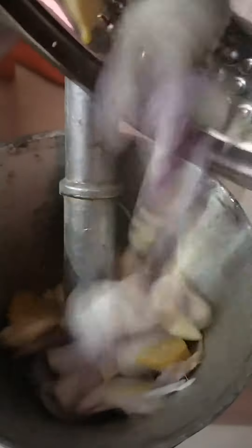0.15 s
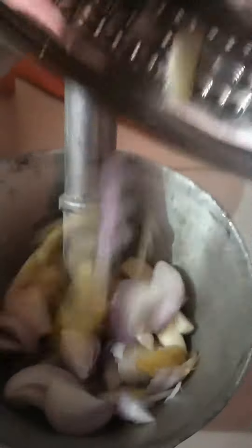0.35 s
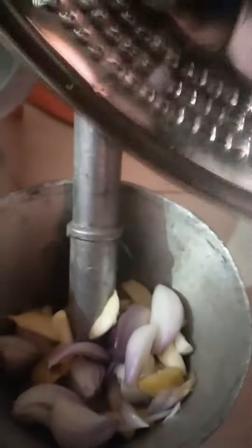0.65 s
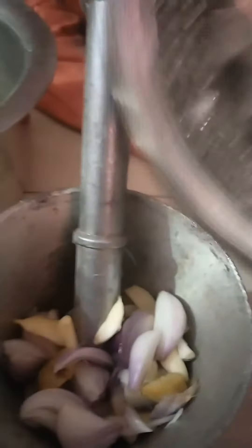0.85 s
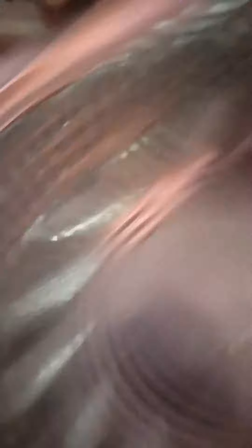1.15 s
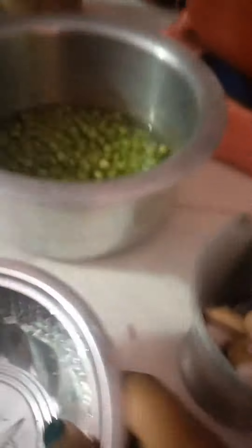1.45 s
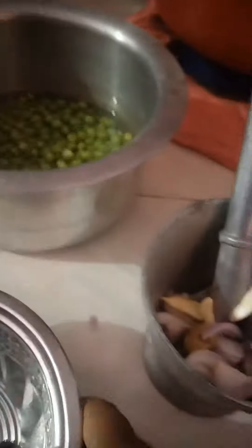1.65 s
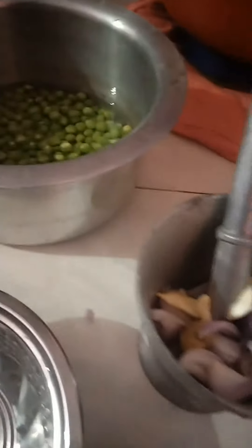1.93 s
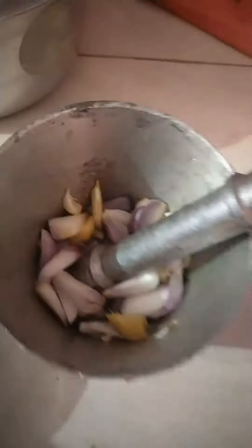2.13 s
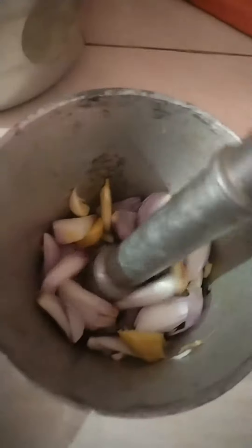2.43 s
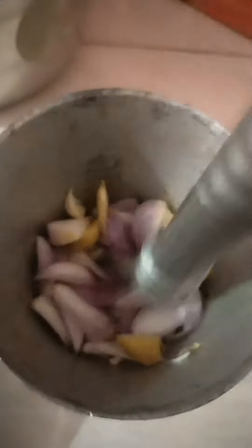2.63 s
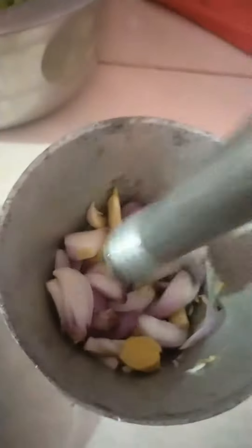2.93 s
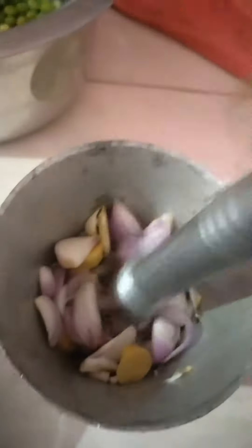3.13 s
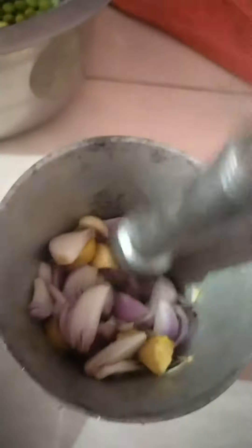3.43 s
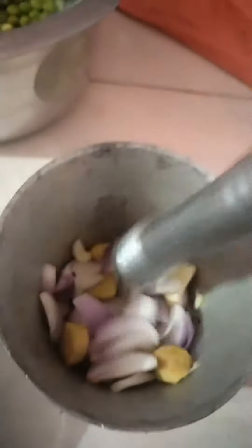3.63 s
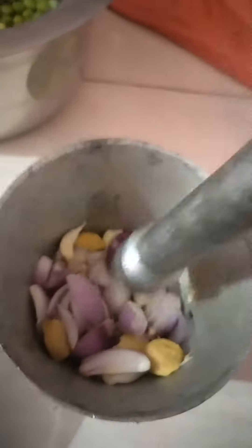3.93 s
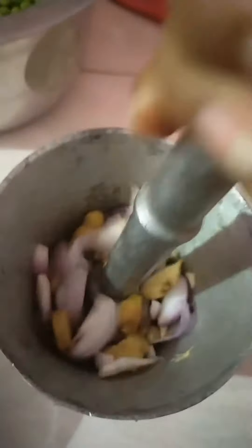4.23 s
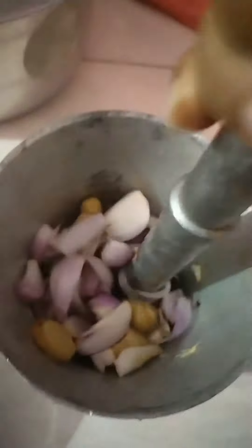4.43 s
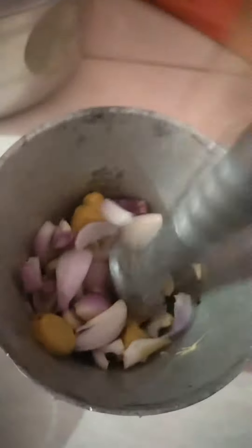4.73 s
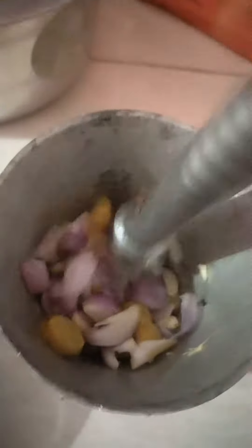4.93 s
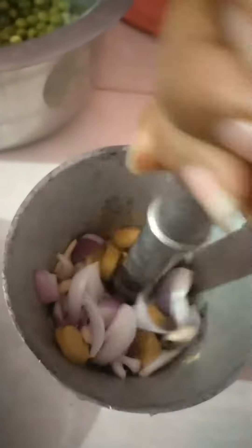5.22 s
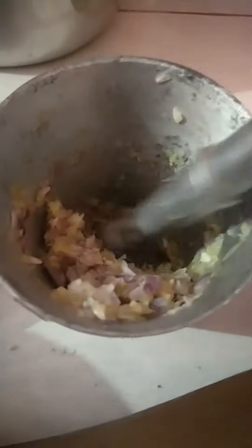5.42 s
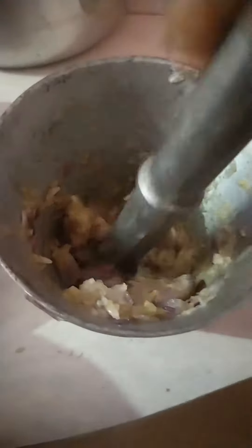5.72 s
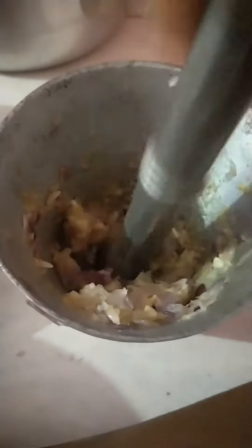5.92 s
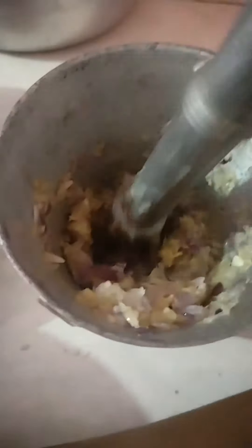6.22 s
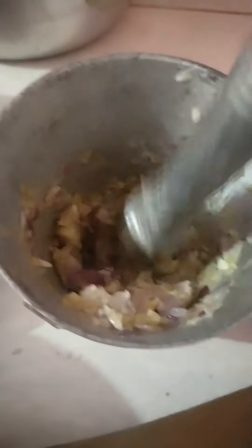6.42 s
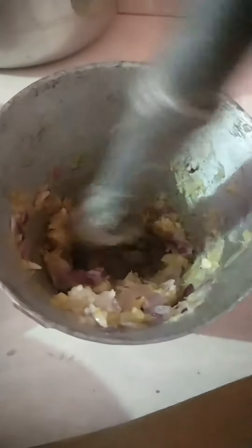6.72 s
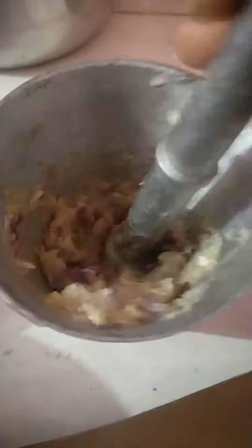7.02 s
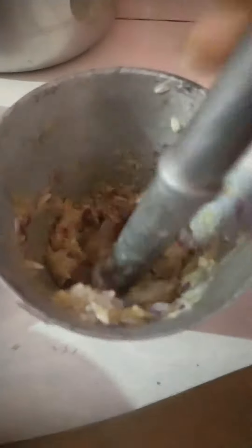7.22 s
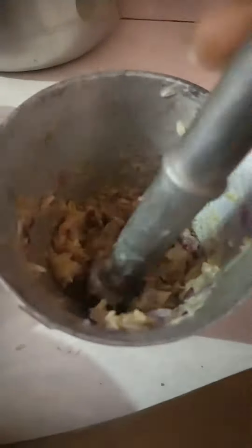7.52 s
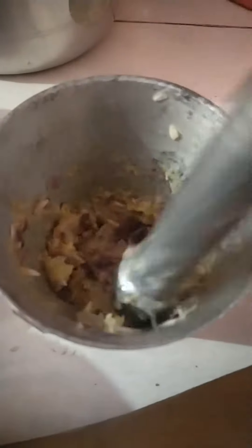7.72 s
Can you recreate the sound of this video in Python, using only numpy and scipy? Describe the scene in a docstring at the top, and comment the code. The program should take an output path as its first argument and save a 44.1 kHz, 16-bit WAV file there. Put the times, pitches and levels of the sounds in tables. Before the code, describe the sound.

Over low room rumble and faint hiss, chopped vegetables spill into a metal bowl with a crackly rustle and small taps. Soft rubbing leads to a bright, buzzing clatter of thin steel. Regular crisp crunches follow as a pestle crushes the pieces. The sound cuts out momentarily, then louder, irregular metal knocks ring through wet mash. The microphone is close, with slight hard-surfaced reverberation.

```python
"""Firm pieces of onion, garlic and ginger rustle and tap into a metal mortar over a low kitchen rumble.
A steel colander clatters on the counter: each bounce is a contact that excites the metal's modes.
A metal pestle then crunches the raw pieces, heard as dense streams of tiny cracks coloured by the bowl.
After a short break the mash is thin and the pestle knocks through to the ringing metal. All is heard
close up, the foreground sounds with a little dense reverberation."""
import sys
import numpy as np
from scipy import signal
from scipy.fft import rfft, irfft, next_fast_len
from scipy.io import wavfile
from scipy.ndimage import uniform_filter1d

SR = 44100
rng = np.random.default_rng(int(sys.argv[2]) if len(sys.argv) > 2 else 0)


def materialize(psi):
    """Save the field psi as 16-bit PCM at rate SR to the path in sys.argv[1].

    A 1-D psi becomes a single channel; in a 2-D psi each row is a channel.
    """
    bounded = np.clip(np.atleast_2d(psi).T, -1, 1)
    quanta = np.round(bounded * 32767).astype(np.int16)
    wavfile.write(sys.argv[1], SR, quanta)


N = 346626
SIZE = 16384  # samples in one short event
TIME, AGE, BINS = np.arange(N) / SR, np.arange(SIZE) / SR, np.fft.rfftfreq(SIZE, 1 / SR)

# Ringing modes of pestle and mortar. Each row: frequency in Hz, relative level in dB, t60 in seconds.
MORTAR_MODES = [(1222, -10, .13), (1335, -3, .22), (1410, -3, .11), (2223, -12, .15), (2885, -8, .18),
                (2988, -1, .23), (3042, -6, .2), (3262, -11, .12), (4247, -15, .18), (5259, -6, .16),
                (5300, -8, .13), (7267, -16, .11), (8160, -12, .11), (9367, -24, .13)]
# Spectrum of a knock on the mortar. Each row: frequency in Hz, relative level in dB per Hz.
KNOCK_SPECTRUM = [(100, -33.5), (250, -6), (420, -3.5), (620, -13), (1000, 0), (1750, -1.5), (2600, 0),
                  (3700, -4), (5500, -12), (8300, -3.5), (10300, -26.5), (12500, -21), (14500, -18),
                  (16000, -43.5)]
# Spectrum of crushed or rubbed food. Each row: frequency in Hz, relative level in dB per Hz.
CRUNCH_SPECTRUM = [(150, -24.5), (450, -7), (620, -11.5), (800, -2.5), (1100, 2), (1700, -2), (2500, -2),
                   (4500, -5.5), (7000, -5), (9500, -11.5), (14000, -13.5), (15500, -2.5)]
# Full blows: the pestle glances off the wall, then seats on the bottom a moment later.
# Each row: start in seconds, glance level in dB, lag of the seating in seconds, seating level in dB,
# brightness in dB, ring in dB, favoured frequency in Hz, its lift in dB (levels before the mix trims).
FULL_BLOWS = [(5.9441, -20.5, .005, -13.5, -3.5, -26, 2750, 5),
              (6.3462, -16, .0026, -22.5, -2.5, -33, 2400, 5),
              (6.711, -45, .008, -26.5, -14, -34, 2540, 14), (6.85, -32, .006, -36.5, 6.5, -34, 2300, -1),
              (6.972, -29.5, .018, -22, 4.5, -6.5, 2180, 14),
              (7.118, -19.5, .006, -18, -8, -25.5, 2426, 10),
              (7.2638, -16.5, .004, -33, 7.5, -5.5, 3080, 14), (7.526, -24.5, .017, -21, 3, -0.5, 3110, 10),
              (7.7705, -22.5, .0082, -19, -3, -2, 5450, 13), (7.8224, -24, .014, -36, 0.5, -0.5, 3070, 6.5)]


def amp(db):
    """Decibel law: 20 dB is a tenfold gain in amplitude."""
    return np.exp(np.asarray(db) * np.log(10) / 20)


def unit(x):
    """Normalisation of a signal to an rms of 1."""
    return x / np.sqrt(np.mean(x ** 2) + 1e-20)


def spectrum(points, hz):
    """Interpolation of a table along a logarithmic frequency axis."""
    table_hz, value = np.transpose(points)
    return np.interp(np.log(hz + 1), np.log(table_hz + 1), value)


def curve(points):
    """Linear interpolation of a table along time."""
    return np.interp(TIME, *np.transpose(points))


def add(mix, s, sound):
    """Superposition: a sound is summed into the mix from time s in seconds."""
    start = round(s * SR)
    sound = sound[:, max(-start, 0):]
    part = mix[:, max(start, 0):][:, :sound.shape[1]]
    part += sound[:, :part.shape[1]]


def pair(shape, same):
    """Partial coherence: two noises whose correlation is same."""
    a, b = rng.standard_normal((2, shape))
    same = np.clip(same, 0, 1)
    return np.array([a, same * a + np.sqrt(1 - same ** 2) * b])


def wander(step_s):
    """Random modulation: a new chance value every step_s seconds, joined by straight lines."""
    values = rng.standard_normal(SIZE)
    return np.interp(TIME / step_s, np.arange(SIZE), values)


def sized(x, db, length):
    """Energy scaling: x gets the energy of a sound of level db lasting length seconds."""
    rms = np.sqrt(np.sum(x ** 2) / 2 / (length * SR))
    return amp(db) * x / rms


def causal(db):
    """Minimum phase: the Hilbert transform of the log gain over BINS gives the phase."""
    mirrored_db = np.r_[db, db[-2:0:-1]]
    log_gain = np.log(amp(mirrored_db))
    return np.exp(np.conj(signal.hilbert(log_gain)))[:len(db)]


def colour(points, thud_db, bright_db, focus_hz=1000, lift_db=0):
    """Excitation spectrum: low and high shelves, and a band favoured by the spot that is hit."""
    shelves = [(1400, thud_db), (2100, 0), (4300, 0), (7000, bright_db)]  # Hz, dB
    octaves = np.log2((BINS + 1) / focus_hz)
    lift = lift_db * np.exp(-(octaves / .24) ** 2)
    return causal(spectrum(points, BINS) + spectrum(shelves, BINS) + lift)


def bowl(depth_db):
    """Cavity resonance: direct sound plus the bowl's air resonances, as each microphone hears them."""
    # Resonances of the air in the mortar.
    # Each row: frequency in Hz, width in Hz, left level in dB, right level in dB (before depth_db).
    air_modes = [(797, 120, 2, 2), (986.4, 84, 10, 16.5), (1046, 64, 3.5, 1.5), (1270, 74, 3, 9),
                 (1250, 110, 2.5, -3.5), (2116, 230, -11, -2), (2790, 190, -4, -1),
                 (4900, 600, -16.5, -0.5), (5896, 250, -14.5, 1.5), (7020, 500, -9.5, -0.5)]
    response = np.ones((2, len(BINS)), complex)
    for hz, width, left_db, right_db in air_modes:
        peak = 1j * BINS * width / (hz ** 2 - BINS ** 2 + 1j * BINS * width)
        response += amp(depth_db) * amp([[left_db], [right_db]]) * peak
    return response


def ports(x):
    """Inter-channel differences: the two microphones differ in phase and level with frequency."""
    # Phase of the left against the right. Each row: frequency in Hz, lead of the left in radians.
    phase_lead = [(0, 1), (500, 2), (700, -2), (1100, -2.5), (1550, -4), (2300, -4.5), (3000, -5),
                  (4300, -5.5), (5300, -8), (7500, -9), (15000, -15)]
    # Balance of the two microphones. Each row: frequency in Hz, left minus right in dB.
    balance = [(300, 4), (600, 1), (1100, 1.7), (2500, 0.7), (5000, -2.2), (8500, 2.5), (14000, -2.2)]
    size = next_fast_len(N + SIZE, real=True)
    hz = np.fft.rfftfreq(size, 1 / SR)
    side = amp(spectrum(balance, hz) / 2)
    left = side * np.exp(1j * spectrum(phase_lead, hz))
    right = 1 / side
    return irfft(rfft(x, size) * np.array([left, right]), size)[:, :N]


def wash(points, same):
    """Spectral shaping: steady noise of a given spectrum, scaled to rms 1."""
    size = next_fast_len(N, real=True)
    gain = amp(spectrum(points, np.fft.rfftfreq(size, 1 / SR)))
    return unit(irfft(rfft(pair(size, same)) * gain, size)[:, :N])


def background():
    """Stationary and modulated noise: low rumble, soft hiss and a few wavering tones."""
    # Rumble spectrum. Each row: frequency in Hz, relative level in dB per Hz.
    rumble_spectrum = [(12, -35), (20, -4.5), (59, 9), (147, -1), (243, -8), (287, -11), (512, -36),
                       (700, -48), (910, -67), (1540, -120)]
    # Hiss spectrum. Each row: frequency in Hz, relative level in dB per Hz.
    hiss_spectrum = [(300, 7), (600, 2.5), (1200, -4.5), (2200, -10), (3200, -8.5), (4500, -18),
                     (7000, -19.5), (10000, -23.5), (15500, -27.5)]
    # Rumble level before its random wander. Each row: time in seconds, dB under 110 Hz, dB above.
    rumble_levels = np.array([(0, -52, -46.5), (.6, -53, -53), (.9, -53, -47.5), (1.35, -46.5, -53.5),
                              (1.8, -56, -54.5), (2.25, -51.5, -56.5), (2.6, -55.5, -52.5), (3.3, -54, -53),
                              (4.4, -54, -54), (5.3, -54, -53.5), (5.43, -75, -64), (5.6, -46.5, -54),
                              (6.1, -51.5, -53.5), (6.45, -48.5, -46), (6.75, -53, -57), (7.0, -57.5, -54),
                              (7.4, -58, -56), (7.86, -54, -48)])
    # Hiss level. Each row: time in seconds, level in dB.
    hiss_levels = [(0, -63), (1, -70.5), (2.4, -68), (5.3, -67.5), (5.45, -57.5), (5.7, -71), (6.5, -63),
                   (7.86, -70)]
    # Faint tones that come and go.
    # Each row: start in seconds, end in seconds, frequency in Hz, width in Hz, level in dB.
    faint_tones = [(2.3, 5.3, 161, 8, -55), (2.85, 3.5, 162, 2, -48), (6.38, 6.57, 246, 4, -43),
                   (2.04, 2.14, 3779, 80, -77), (4.6, 5.4, 3460, 90, -82), (5.3, 5.85, 3068, 20, -70),
                   (5.3, 5.95, 3400, 70, -71), (5.54, 5.76, 3400, 50, -68), (5.55, 5.75, 4097, 30, -80),
                   (5.9, 6.6, 3410, 40, -75)]

    rumble = wash(rumble_spectrum, 0.97)
    lowpass = signal.butter(3, 110, fs=SR, output="sos")
    deep = signal.sosfiltfilt(lowpass, rumble)
    deep_level = amp(curve(rumble_levels[:, [0, 1]]))
    upper_level = amp(curve(rumble_levels[:, [0, 2]]))
    out = unit(deep) * deep_level + unit(rumble - deep) * upper_level
    out *= amp(1.77 * wander(.09))  # the rumble swells and sinks at random: dB, seconds
    out += wash(hiss_spectrum, 0.04) * amp(curve(hiss_levels))
    for start, end, hz, width, db in faint_tones:
        count = max(round((end - start) * SR), 2)
        # a phase that wanders at random widens the line
        steps = uniform_filter1d(rng.standard_normal(count), size=200)
        drift = np.cumsum(steps) * np.sqrt(2 * np.pi * abs(width) / SR)
        tone = np.sqrt(2) * np.sin(2 * np.pi * hz * TIME[:count] + drift)
        tone *= signal.windows.tukey(count, .3)
        add(out, start, amp(db) * np.array([tone, tone]))
    return out


def crackle(count, grain_db=1.5, cracks_per_s=5000):
    """Shot noise: a stream of tiny cracks of random size at random instants."""
    size = amp(grain_db * np.minimum(rng.exponential(1, count), 3))
    happens = rng.random(count) < cracks_per_s / SR
    return pair(count, 0.65) * size * happens


def rustle(tone):
    """Filtered shot noise: steady crackle of a given colour, scaled to rms 1."""
    return unit(signal.oaconvolve(crackle(N), irfft(tone), axes=1)[:, :N])


def pour(air):
    """Granular flow: pieces slide off the colander and rustle into the bowl in random clumps."""
    # Strength of the flow before clumping. Each row: time in seconds, level in dB.
    flow = [(0, -54), (.025, -47), (.05, -52.5), (.075, -38), (.097, -33), (.122, -49), (.16, -46.5),
            (.205, -57), (.24, -46.5), (.27, -54.5), (.33, -48), (.365, -43.5), (.395, -57.5),
            (.425, -49.5), (.47, -49.5), (.53, -83), (.6, -100)]
    clump_db, clump_s = 2.0, 0.012
    tone = colour(CRUNCH_SPECTRUM, thud_db=0, bright_db=-1) * air
    return rustle(tone) * amp(curve(flow) + clump_db * wander(clump_s))


def strike(row, points, air, modes, chatter, chatter_s, ring_db, same):
    """Impact and modal response: a sharp contact, decaying chatter, and the metal's ringing modes."""
    soft_below_db, soft_db_per_octave, soft_from_hz = -36, 7.5, 2500
    s, db, thud_db, bright_db, own_ring_db, focus_hz, lift_db = row
    contact = pair(SIZE, same) * np.exp(-AGE / chatter_s)
    contact *= chatter / np.linalg.norm(contact[0])
    contact[:, 0] -= 1  # the first sharp contact
    tone = colour(points, thud_db, bright_db, focus_hz, lift_db) * air
    blow = sized(irfft(rfft(contact) * tone), db, .01)
    ring = np.zeros((2, SIZE))
    for hz, mode_db, t60 in modes:
        # where the blow lands decides how strongly each mode answers; the load detunes the metal a little
        phase = rng.uniform(0, 2 * np.pi) + 0.83 * rng.standard_normal((2, 1))
        pitch, share_db = hz * rng.normal(1, .001), rng.normal(0, 1.5)
        # gentle contacts hardly wake the high modes
        soft_db = soft_db_per_octave * max(np.log2(hz / soft_from_hz), 0) * (db < soft_below_db)
        decay = amp(mode_db + share_db - soft_db - 60 * AGE / t60)
        ring += decay * np.sin(2 * np.pi * pitch * AGE + phase)
    fade = np.clip(2 - 2 * AGE / AGE[-1], 0, 1)
    return s, (blow + amp(db + own_ring_db + ring_db) * ring) * fade


def drops():
    """Impact in a cavity: firm pieces land in the bowl, each with one short tap."""
    # Landings. Each row: start in seconds, level in dB before the side trims, favoured frequency in Hz.
    landings = [(.281, -39.5, 1330), (.319, -44.5, 6800), (0.3411, -30.5, 2060), (0.403, -47.5, 1250),
                (0.47, -43, 1110), (.573, -53, 1060), (.662, -45.5, 1070), (3.808, -49, 1320),
                (4.095, -55.5, 1300), (4.303, -52, 1280)]
    reference_db, bright_db, lift_db = -43.5, 2.5, 16
    out, air = np.zeros((2, N)), bowl(depth_db=-3.0)
    for s, db, hz in landings:
        # a harder landing is a sharper, drier click
        harder = db - reference_db
        thud_db = 14 - 1.04 * harder
        own_ring_db = -27.5 - 2.5 * harder
        row = s, db, thud_db, bright_db, own_ring_db, hz, lift_db
        add(out, *strike(row, KNOCK_SPECTRUM, air, MORTAR_MODES,
                         chatter=1.2, chatter_s=.0014, ring_db=-7.0, same=0.69))
    return ports(out) * amp([[-1.5], [1.2]])  # left, right dB


def swishes(air):
    """Friction noise: soft, bright rubbing as things are moved about, fading in and out."""
    # Swishes. Each row: start in seconds, end in seconds, level in dB before the mix trims.
    rubs = [(1.024, 1.32, -68.5), (1.326, 1.615, -60.5), (2.303, 2.548, -60)]
    fading_share = 0.81  # part of a swish spent fading in and out
    level = np.zeros((1, N))
    for start, end, db in rubs:
        count = max(round((end - start) * SR), 2)
        add(level, start, amp(db) * signal.windows.tukey(count, fading_share)[None])
    return rustle(colour(CRUNCH_SPECTRUM, thud_db=-7.5, bright_db=9) * air) * level


def colander():
    """Repeated impact on a thin shell: the steel rim buzzes against the counter at every bounce."""
    # Bounces of the rim. Each row: start in seconds, level in dB before the side trims, thud in dB,
    # brightness in dB, relative ring in dB, favoured frequency in Hz, its lift in dB.
    bounces = [(1.61, -23, 8, -1, -10, 1073, 4.5), (1.623, -25.5, 6, -7, -6, 1400, 0.5),
               (1.639, -26.5, 8.5, 0, -2, 1790, 6.5), (1.659, -22.5, 4.5, 9.5, -3.5, 4500, 6),
               (1.673, -27, 1.5, 3, -3, 315, 7), (1.689, -25, -5.5, 1.5, -7, 2860, 6.5),
               (1.719, -27, -5.5, 2.5, -9.5, 1150, 12.5), (1.753, -24.5, -13.5, 0.5, -4.5, 3850, 10),
               (1.77, -22.5, -4, 4, -13, 3780, 8), (1.78, -32, -10.5, 6.5, -11.5, 3760, 8.5)]
    # Ringing modes of the colander. Each row: frequency in Hz, relative level in dB, t60 in seconds.
    shell_modes = [(303, 1, .2), (745, -3, .09), (1149, 1, .16), (1696, -6, .17), (2832, -4, .12),
                   (3320, -3, .12), (3763, 1, .15), (4638, -7, .18), (4931, -8, .12), (6115, -9, .12),
                   (6686, -11, .15), (7293, -6, .12), (7865, -8, .12), (10201, -6, .13), (10707, -8, .12),
                   (11807, -11, .12), (12489, -11, .12), (13910, -12, .1), (15224, -9, .1)]
    # Spectrum of the contact. Each row: frequency in Hz, relative level in dB per Hz.
    clatter_spectrum = [(100, -23), (200, -5.5), (320, -1.5), (560, -4.5), (820, -3), (1700, 3), (2500, 0),
                        (4200, 3.5), (6000, -1.5), (9000, -2.5), (12000, -7), (15500, 2.5)]
    out = np.zeros((2, N))
    for row in bounces:
        add(out, *strike(row, clatter_spectrum, 1, shell_modes,
                         chatter=2.7, chatter_s=0.018, ring_db=-10, same=0.05))
    return out * amp([[1.5], [.5]])  # left, right dB


def contacts():
    """Contact sequence of pestle and mortar: a blow is a glance and a seating, a touch is one contact."""
    # Light touches on the wall. Each row: start in seconds, level in dB before the side trims,
    # relative ring in dB, favoured frequency in Hz, its lift in dB.
    touches = [(2.128, -68, -12, 1470, 7.5), (2.369, -44.5, -1, 997, 24.5), (2.676, -45, -26, 2290, 2),
               (4.095, -68.5, 5.5, 3004, 11.5), (4.304, -70, 1, 3000, 10), (4.4, -44, -23.5, 1003, 9),
               (4.767, -40.5, -24.5, 2500, 2.5), (4.978, -38, -28, 3900, 6.5), (5.19, -40.5, -8, 4200, 9),
               (5.826, -41.5, -11, 2714, 4), (6.196, -36, -28, 6500, 19), (6.2385, -33.5, -34, 3400, 7),
               (6.566, -36, -21, 4430, 16.5), (6.711, -36.5, -24, 6860, 7), (6.74, -49, -24, 4950, 20),
               (7.102, -40, -34, 6380, 20.5), (7.643, -52.5, -15, 3960, 13), (7.807, -29.5, -8, 3060, 17)]
    glance_thud_db, touch_thud_db, touch_bright_db = 1, -8.5, 2.5
    seat_thud_db, seat_ring_db = 9, -5.5  # seated, the pestle sounds deeper and damps the ring
    for s, glance_db, lag_s, seat_db, bright_db, ring_db, hz, lift_db in FULL_BLOWS:
        yield s, glance_db, glance_thud_db, bright_db, ring_db, hz, lift_db
        yield s + lag_s, seat_db, seat_thud_db, bright_db, ring_db + seat_ring_db, hz, lift_db
    for s, db, ring_db, hz, lift_db in touches:
        yield s, db, touch_thud_db, touch_bright_db, ring_db, hz, lift_db


def knocks():
    """Modal excitation by impact: the pestle reaches the metal of the mortar and both ring."""
    out, air = np.zeros((2, N)), bowl(depth_db=-1.5)
    for row in contacts():
        add(out, *strike(row, KNOCK_SPECTRUM, air, MORTAR_MODES,
                         chatter=1.68, chatter_s=0.0042, ring_db=-6.0, same=0.85))
    return ports(out) * amp([[-.2], [.4]])  # left, right dB


def squeeze(s, db, length, tone, level_db=-5):
    """Fracture under pressure: cracks swell up to time s and die away."""
    rise_share = 0.53  # part of a stroke spent pressing in
    t = AGE - AGE[SIZE // 2]
    side_s = length * np.where(t < 0, rise_share, 1 - rise_share)
    press = np.exp(-abs(t / side_s) ** 1.44)
    sound = irfft(rfft(crackle(SIZE) * press) * tone)
    return s + t[0], sized(sound, db + level_db, 0.36 * length)


def crunches():
    """Brittle fracture in a cavity: cell walls burst under the pestle; also the pouring and the swishes."""
    # Strokes that crush the food; the depth of the sound varies from stroke to stroke. Each row: peak in
    # seconds, level in dB before the mix trims, thud in dB, brightness in dB, length in seconds.
    strokes = [(2.704, -28.5, -7, -2.5, .029), (3.024, -30, -5.5, 2.5, 0.036),
               (3.298, -33.5, -9, -0.5, 0.036), (3.548, -30.5, -3, 2.5, 0.038),
               (3.772, -27.5, -7.5, 0, 0.032), (4.023, -30.5, -9.5, -1.5, 0.033),
               (4.239, -27.5, -6, 0.5, 0.025), (4.421, -27.5, -8.5, -5.5, 0.026),
               (4.6, -32.5, -8, 2, 0.029), (4.766, -26, -12, 2.5, 0.011), (4.97, -24.5, 2.5, 0.5, 0.023),
               (5.196, -31, -2, 1, 0.032), (5.769, -36.5, -3.5, 2, 0.048), (5.942, -24, -4.5, -1.5, 0.025),
               (6.057, -33.5, 0.5, 4, 0.024), (6.099, -39, -12.5, -1.5, .026), (6.202, -34, -5.5, 7, 0.034),
               (6.242, -36, -22.5, -7, 0.032), (6.338, -17, 2.5, 1.5, 0.007), (6.534, -42, -10, 2, 0.037),
               (6.713, -20.5, -6.5, 9.5, 0.0085), (6.857, -28.5, -7.5, -1, .018), (7.005, -22, 1, -7, .045),
               (7.128, -30.5, 5.5, -15, 0.03), (7.296, -27, 1, -10, .036), (7.555, -22.5, 8.5, -0.5, 0.029),
               (7.824, -21, 8, -6.5, 0.041)]
    air = bowl(depth_db=-6)
    out = pour(air) + swishes(air)
    for s, db, thud_db, bright_db, length in strokes:
        add(out, *squeeze(s, db, length, colour(CRUNCH_SPECTRUM, thud_db, bright_db) * air))
    # a very short, faint crackle leads into each full blow; level relative to the glance
    lead_in_db, lead_in_ahead_s, lead_in_s = -10.5, .001, 0.0065
    lead_in = colour(CRUNCH_SPECTRUM, thud_db=-0.5, bright_db=4) * air
    # afterwards mash spatters against the wall; level relative to the stronger contact
    spatter_db, spatter_lag_s, spatter_s = -19, .03, .04
    spatter = colour(CRUNCH_SPECTRUM, thud_db=-2.5, bright_db=-6.5) * air
    for s, glance_db, _, seat_db, *_ in FULL_BLOWS:
        add(out, *squeeze(s - lead_in_ahead_s, glance_db + lead_in_db, lead_in_s, lead_in))
        stronger_db = max(glance_db, seat_db)
        add(out, *squeeze(s + spatter_lag_s, stronger_db + spatter_db, spatter_s, spatter))
    return ports(out) * amp([[-1.5], [1.5]])  # left, right dB


def uneven(x, patchy_db, order):
    """Random spectral modulation: every few ms other pitches stand out, in patches order bins wide."""
    z = signal.stft(x, nperseg=256)[2]
    patches = uniform_filter1d(rng.standard_normal(z.shape[1:]), order, axis=0)
    patches = unit(uniform_filter1d(patches, size=3, axis=1))
    gain = amp(patchy_db * np.clip(patches, -2, 2))
    return signal.istft(z * unit(gain), nperseg=256)[1][:, :N]


def kitchen(x, build_s=0.0072):
    """Diffuse reverberation: dense reflections off tiles and counter, each band dying at its own speed."""
    # Decay of the room. Each row: frequency in Hz, t60 in seconds.
    decay = [(200, 0.28), (800, 0.17), (2100, 0.2), (5500, .2), (15000, 0.19)]
    hz, t, z = signal.stft(rng.standard_normal((2, SIZE)), SR, nperseg=256)
    decaying = z * amp(-60 * t / spectrum(decay, hz)[:, None])
    tail = signal.istft(decaying, SR, nperseg=256)[1][:, :SIZE]
    tail *= np.clip(AGE / build_s - .3, 0, 1)  # the reflections build up first
    return signal.fftconvolve(x, tail / np.linalg.norm(tail[0]), axes=1)[:, :N]


def scene():
    """Superposition of everything on the counter, the room's answer and the background."""
    knock = knocks() + drops()
    crunch = uneven(crunches(), patchy_db=4.0, order=5)
    clatter = uneven(colander(), patchy_db=3.0, order=3)
    room = kitchen(amp(-14.5) * knock + amp(-17.0) * crunch + amp(-13) * clatter)
    return knock + crunch + clatter + room + background()


def record(dry):
    """Gain, saturation and band limit: the sound breaks off briefly, loud peaks are rounded, the top is cut."""
    # The sound drops out between the two spells of pounding, and once more briefly.
    # Each row: time in seconds, gain in dB.
    dropouts = [(5.299, 9.5), (5.303, -45), (5.42, -54), (5.427, -7), (5.55, 4.5), (6.58, 1), (6.6, -1),
                (6.615, -41), (6.624, 5.5)]
    ceiling, edge_hz = .85, 15650
    x = dry * amp(curve(dropouts))
    x = x / np.sqrt(np.sqrt(1 + np.square(np.square(x / ceiling))))
    lowpass = signal.firwin(255, edge_hz, window=("kaiser", 8), fs=SR)
    return signal.oaconvolve(x, lowpass[None], "same")


dry = scene()
out = record(dry)
materialize(out)
```